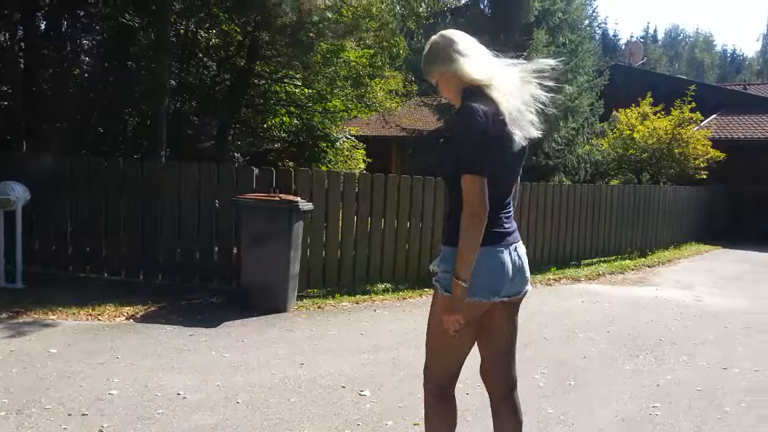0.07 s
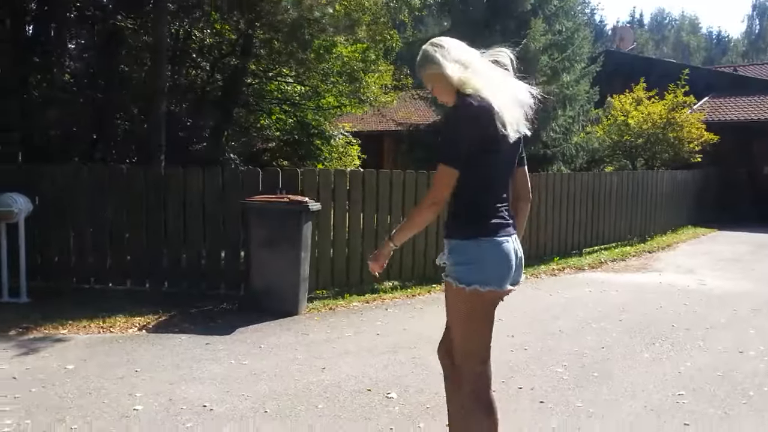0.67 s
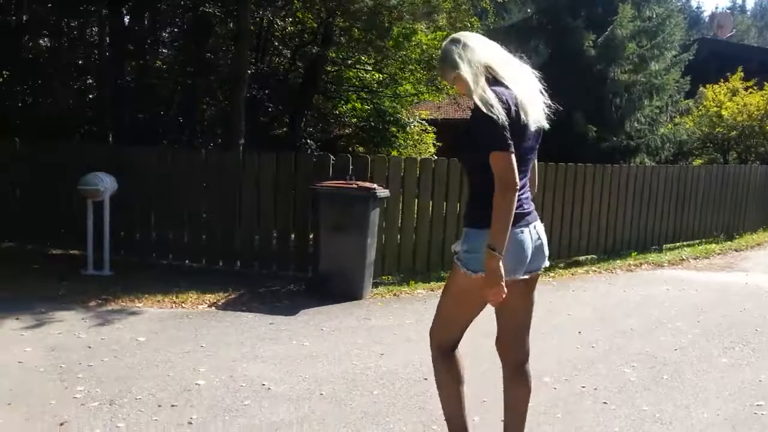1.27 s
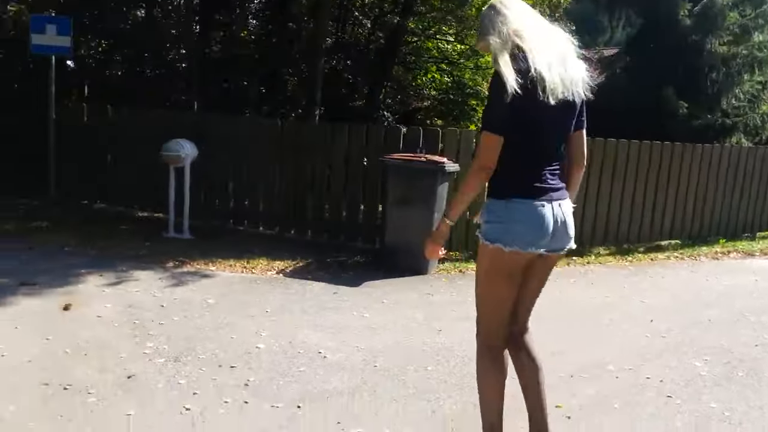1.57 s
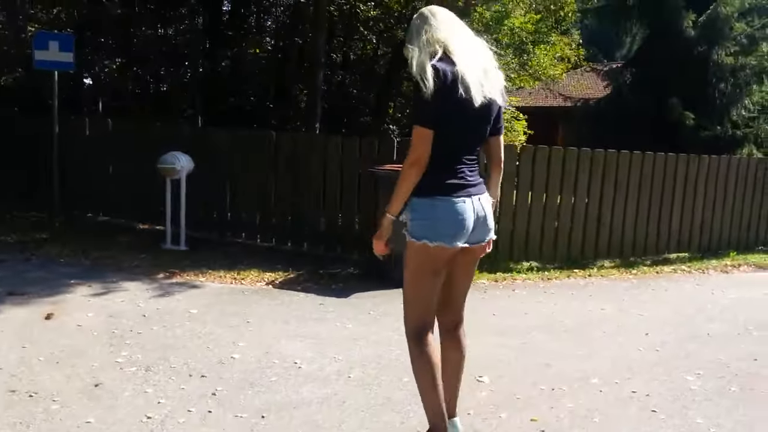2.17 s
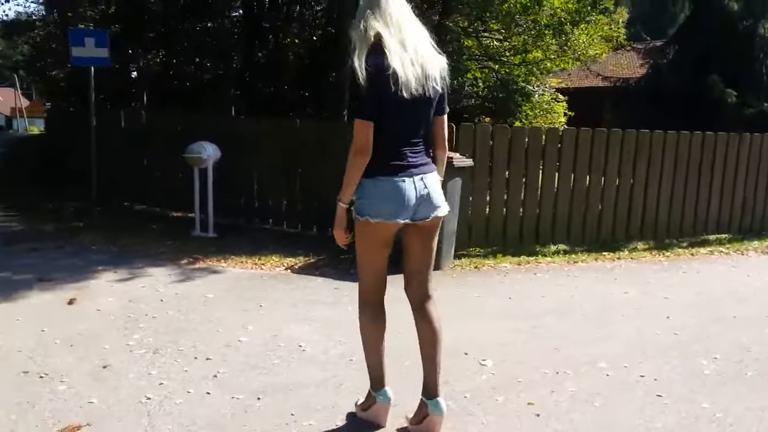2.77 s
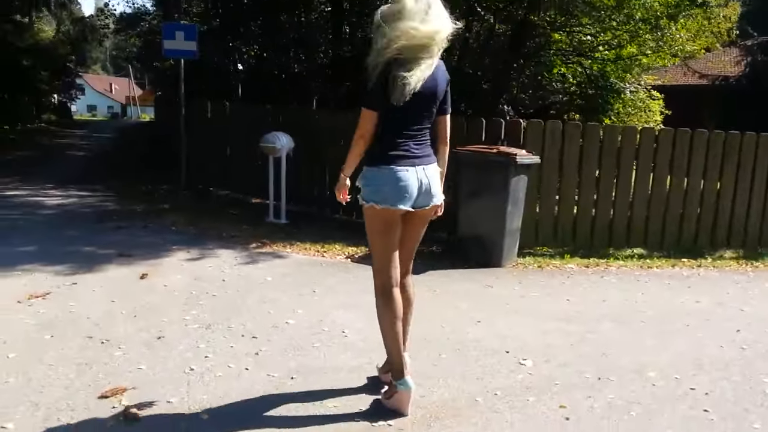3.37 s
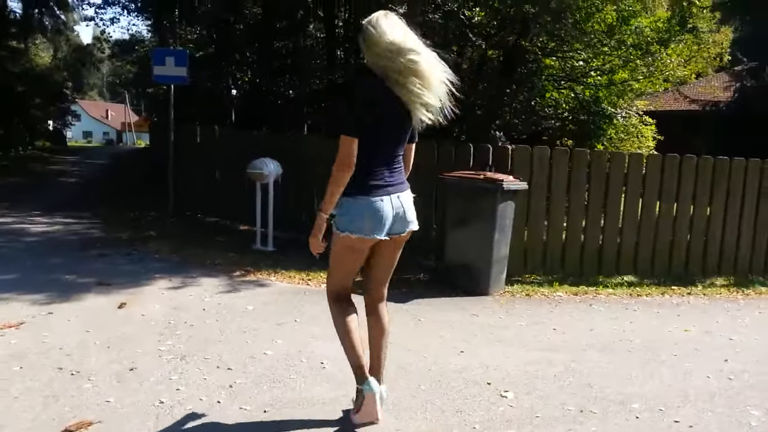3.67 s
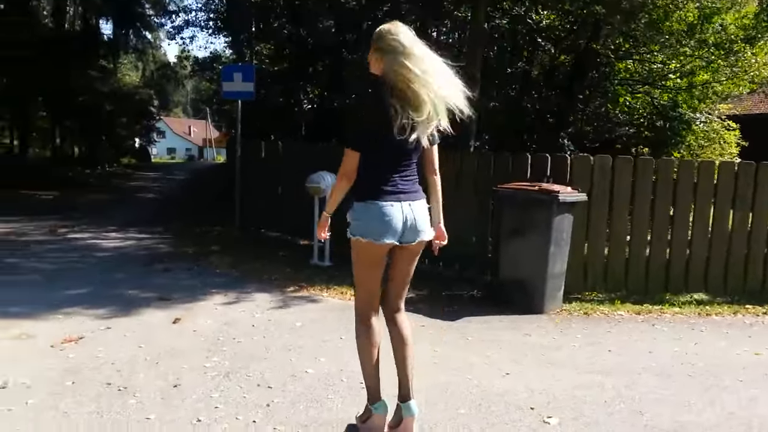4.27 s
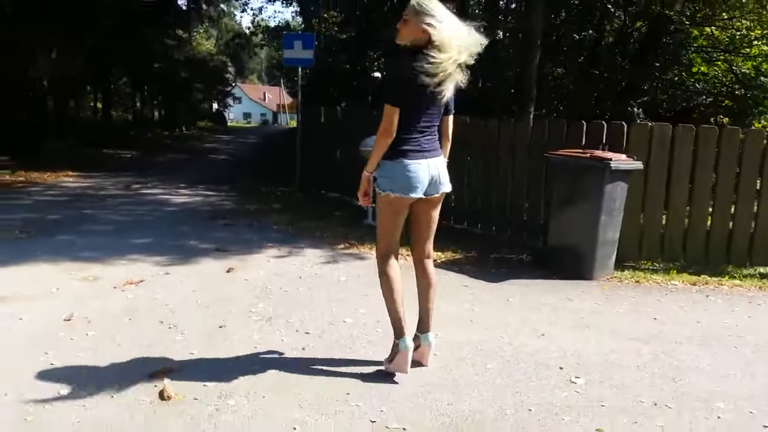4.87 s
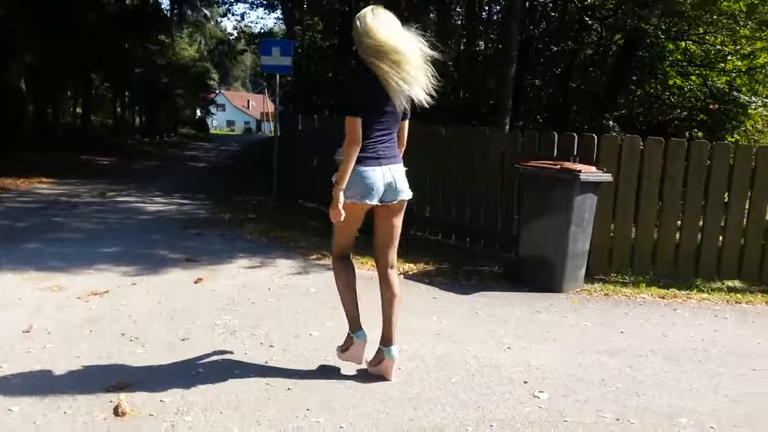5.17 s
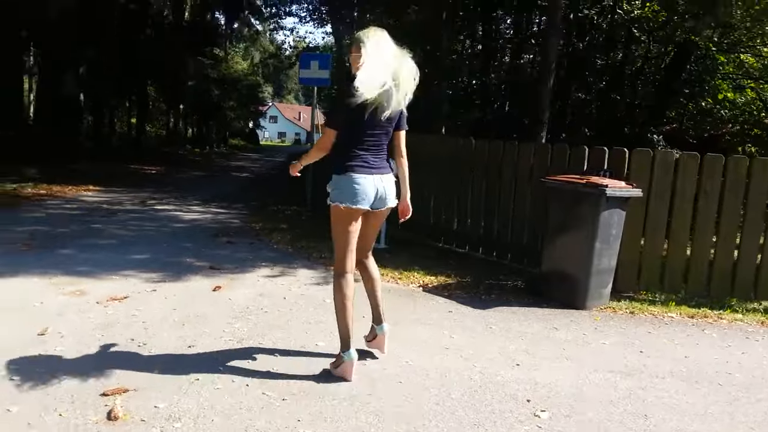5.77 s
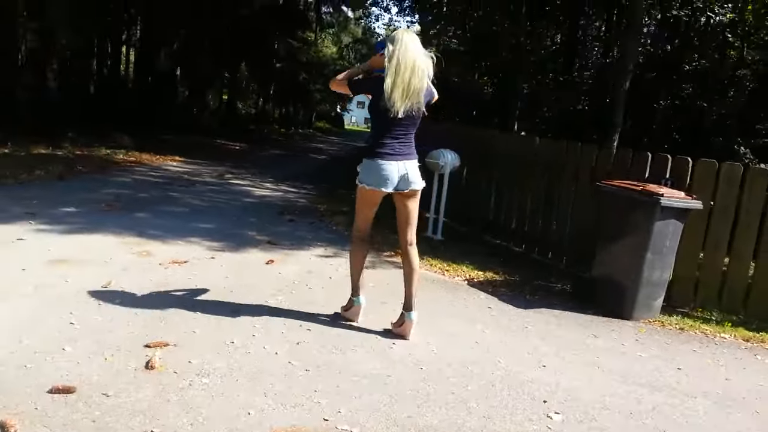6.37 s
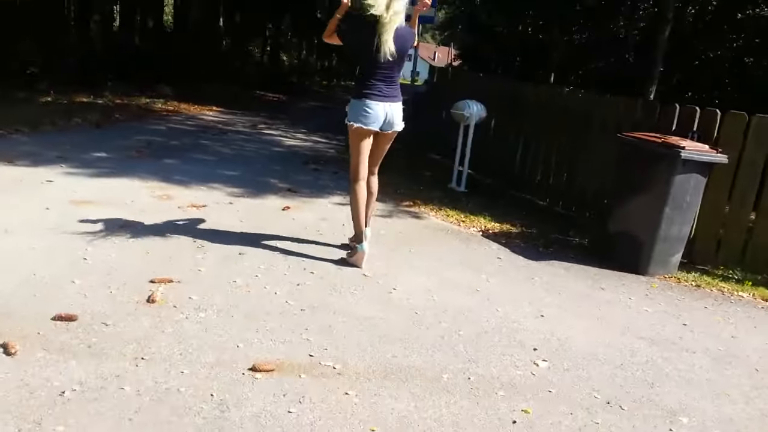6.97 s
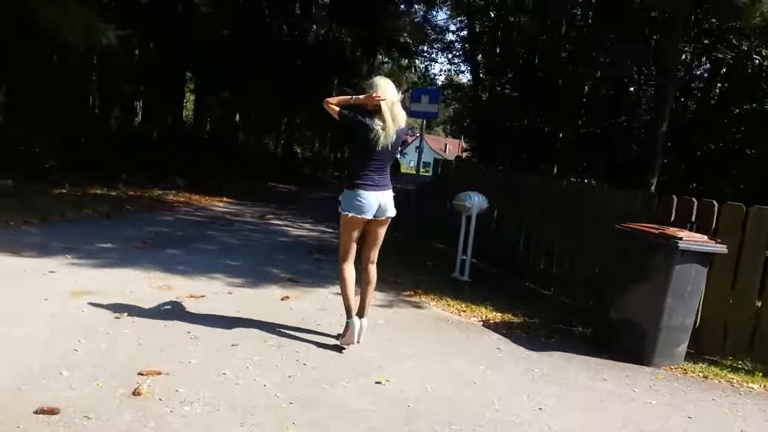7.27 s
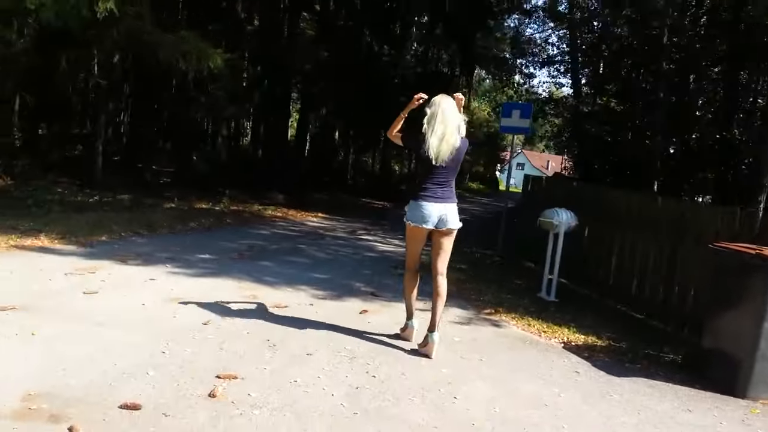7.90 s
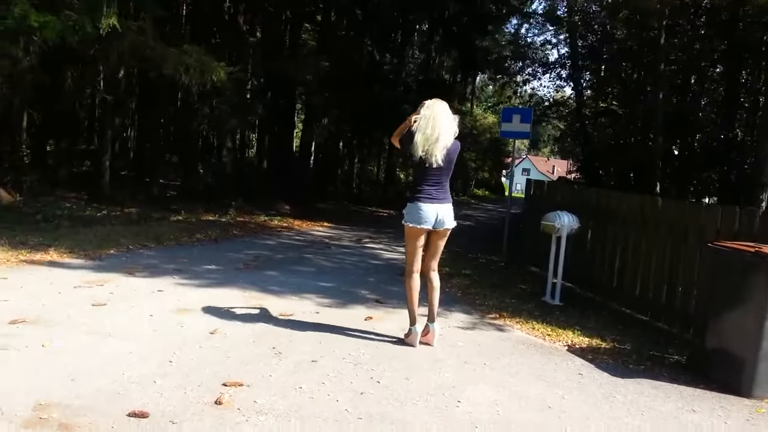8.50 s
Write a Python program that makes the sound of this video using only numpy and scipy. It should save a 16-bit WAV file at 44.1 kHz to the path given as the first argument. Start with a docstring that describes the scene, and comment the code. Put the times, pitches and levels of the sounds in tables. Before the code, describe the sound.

Wind rumbles unevenly on a hand-held microphone, building to strong sputtering gusts midway and then easing. Quieter heeled footsteps knock and crunch irregularly on an asphalt road beneath it, along with close cloth rustles and small snaps. A few very faint, high bird calls come through a soft wash of trees. Later the footsteps end, leaving wind, brief finger rubs and light handling clicks.

```python
"""Gusts buffet the two microphone ports of a hand-held camera: eddies swept past a port are heard as
a rumble, hardest on the left, where puffs break away and single eddies pop. Under the wind, someone
in wedge heels takes short, uneven steps on gritty asphalt, each impact exciting the shoe's resonances.
Sleeve and fingers rustle and tick on the camera by friction and small knocks.
A small bird gives thin, high calls over a soft wash of air in the trees."""
import sys
import numpy as np
from scipy import signal
from scipy.fft import rfft, irfft, next_fast_len
from scipy.io import wavfile
from scipy.ndimage import uniform_filter1d, map_coordinates

SR = 44100
rng = np.random.default_rng(int(sys.argv[2]) if len(sys.argv) > 2 else 0)


def pcm_store(signal):
    """Save signal as 16-bit PCM."""
    levels = np.round(np.clip(np.atleast_2d(signal), -1, 1) * 32767)
    wavfile.write(sys.argv[1], SR, levels.astype(np.int16).T)


N = 385434
T = np.arange(N) / SR
REFERENCE_DB = -35  # wind level at which the eddies have their nominal corner frequency

# steady friction of holding the camera: t/s, sleeve level/dB, grip level/dB
HOLD_FRICTION = [(.44, -71.5, -69.5), (.8, -61, -60.5), (2.05, -66, -68.5), (2.55, -61, -59.5),
                 (3.1, -53.5, -61), (3.75, -54, -57), (3.93, -62.5, -67), (4.15, -54, -60), (4.6, -62, -67),
                 (5.35, -55.5, -55.5), (6.06, -55, -64), (6.16, -65, -71), (6.45, -66.5, -68),
                 (6.76, -58.5, -64), (6.92, -54.5, -51.5), (7.3, -59, -57), (8.73, -61.5, -62)]
# response of the left port's cavity: f/Hz, gain/dB
PORT_CAVITY = [(300, -21), (1500, -26), (3200, -26.5), (4100, -8), (5150, -4), (6000, -8), (7000, -16.5),
               (10000, -21.5), (15000, -40)]
# resonances of a shoe on asphalt: f/Hz, bandwidth/Hz, gain/dB
SHOE_MODES = [(520, 160, 5.5), (850, 285, 3.5), (1370, 186, 3.5), (1780, 280, 1), (2615, 280, 1),
              (4500, 1400, -9), (6200, 3700, -17)]
# spectrum of cracking grit: f/Hz, gain/dB
GRIT_SPECTRUM = [(200, -19), (1000, -12), (2500, 7), (6000, 11), (10000, 8), (15000, -11)]


def amp(db):
    """Amplitude ratio of a level in decibels."""
    return 10 ** (np.asarray(db) / 20)


def unit(x):
    """Normalisation to rms 1."""
    return x / np.sqrt(np.mean(x ** 2) + 1e-20)


def decay(t, t60):
    """Exponential damping: 60 dB down after t60 seconds."""
    return amp(-60 * t / t60)


def curves(rows):
    """Linear interpolation in time: one value per sample for each column after the first."""
    times, *columns = np.transpose(rows)
    return [np.interp(T, times, column) for column in columns]


def wobble(rate):
    """Smooth random modulation: a spline through rate Gaussian knots a second."""
    return map_coordinates(rng.standard_normal(int(N * rate / SR) + 4), [T * rate])


def swell(s, sigma):
    """Gaussian envelope centred on time s."""
    return np.exp(-np.minimum(((T - s) / sigma) ** 2, 100) / 2)


def filtered(x, response):
    """Linear filtering: the spectrum of x times a complex frequency response."""
    size = x.shape[-1]
    padded = next_fast_len(size + 8192)
    return irfft(rfft(x, padded) * response(np.fft.rfftfreq(padded, 1 / SR)), padded)[..., :size]


def coloured(x, points):
    """Spectral shaping by (f/Hz, gain/dB) points joined on a logarithmic frequency axis."""
    f, db = np.transpose(points)
    return filtered(x, lambda hz: amp(np.interp(np.log(hz + 1), np.log(f), db)))


def resonate(x, modes):
    """Modal superposition: x drives second-order resonators of alternating sign."""
    return filtered(x, lambda f: sum(
        (-1) ** k * amp(db) * 1j * f * width / (hz * hz - f * f + 1j * f * width)
        for k, (hz, width, db) in enumerate(modes)))


def bass_cut(x, hz):
    """The microphone's third-order high-pass."""
    return signal.sosfilt(signal.butter(3, hz, "high", fs=SR, output="sos"), x)


def add(track, s, sound):
    """Superposition of a sound on a track from time s."""
    span = track[..., max(round(s * SR), 0):][..., :sound.shape[-1]]
    span += sound[..., :span.shape[-1]]


def grains(rate, spread_db):
    """Log-normal modulation breaks noise into short, uneven grains; rms 1."""
    return unit(rng.standard_normal(N) * amp(spread_db * wobble(rate)))


def outdoors(x, wet_db, t60):
    """Scattering: a diffuse tail from fence and trees follows the direct sound to both ports."""
    t = np.arange(SR // 3) / SR
    tail = rng.standard_normal((2, len(t))) * decay(t, t60) * (1 - np.exp(-t / .0055))
    tail /= np.linalg.norm(tail, axis=1, keepdims=True)
    return x * amp([[.5], [-.5]]) + amp(wet_db) * signal.fftconvolve(x[None], tail, axes=1)[:, :N]


def air_in_trees():
    """Diffuse flow noise: a soft wash, wide because it is uncorrelated between the ports."""
    # spectrum of distant trees: f/Hz, gain/dB
    spectrum = [(30, -4), (150, 10.5), (400, 10), (1000, 4.5), (2500, 2), (6000, -6), (10500, -73.5),
                (15000, -66)]
    return amp(-63.5) * unit(coloured(rng.standard_normal((2, N)), spectrum))


def bird():
    """Frequency modulation: thin whistles waver, rise and level off, smeared by scattering."""
    # calls: t/s, length/s, start f/Hz, end f/Hz, level before the path to the ports/dB
    calls = [(1.59, .15, 7500, 8250, -68), (1.8, .09, 8400, 8500, -70), (4.13, .18, 7500, 8150, -57),
             (6.51, .16, 7650, 8150, -56), (6.68, .14, 7900, 8100, -59)]
    out = np.zeros(N)
    for s, length, start_hz, end_hz, db in calls:
        progress = np.clip((T - s) / length, 0, 1)
        hz = start_hz + (end_hz - start_hz) * np.sin(np.pi / 2 * progress) + 110 * wobble(500)
        out += amp(db) * np.sin(np.pi * progress) * np.sin(2 * np.pi * np.cumsum(hz) / SR)
    return outdoors(out, wet_db=-2, t60=.12) * amp([[-7], [-2]])


def sleeve(unsteady_db=1.5, brush_sigma_s=.022):
    """Friction: fibres slip in fine grains near the right port, swelling with each brush; folds snap."""
    # brushes of the sleeve: middle t/s, level/dB
    brushes = [(.81, -53.5), (1.02, -52), (2.455, -51), (3.53, -42.5), (4.33, -48), (4.929, -58.5),
               (6.53, -52.5), (6.94, -55.5), (7.49, -48.5), (8.15, -59.5)]
    # snaps of a fold: t/s, peak level/dB
    snaps = [(1.006, -34), (1.014, -32), (1.154, -30), (2.164, -27), (2.3369, -21), (2.421, -32),
             (2.536, -23), (2.6377, -32.5), (2.8217, -31), (2.8815, -26.5), (3.076, -23), (3.1053, -21),
             (3.2657, -16.5), (4.0351, -22.5), (4.331, -19), (4.3665, -25.5), (4.3785, -27), (4.4691, -34),
             (5.4762, -36), (7.5638, -25), (8.1248, -33)]
    # spectra of rubbing and of snapping cloth: f/Hz, gain/dB
    cloth_spectrum = [(200, -18), (1000, 3), (3000, 7), (6500, 2.5), (9500, 5.5), (12000, 4.5),
                      (15000, -1.5)]
    snap_spectrum = [(1000, -54), (5000, -2), (7500, 10), (9600, 15.5), (12000, 5.5), (15000, -6)]
    level = amp(curves(HOLD_FRICTION)[0] + unsteady_db * wobble(14))
    level += sum(amp(db) * swell(s, brush_sigma_s) for s, db in brushes)
    slips = np.array([grains(1200, spread_db=3.5) for _ in range(2)])
    rustle = level * amp([[-5], [0]]) * unit(coloured(slips, cloth_spectrum))
    t = np.arange(SR // 10) / SR
    envelope = decay(t, .0035) + .1 * decay(t, .11)
    for s, db in snaps:
        snap = coloured(rng.standard_normal((2, len(t))) * envelope, snap_spectrum)
        add(rustle, s - .0005, amp(db) * amp([[-11], [0]]) * snap / np.abs(snap).max())
    return rustle


def grip():
    """Resonance: rubbing and ticking ring the left port's cavity; the case's modes add a small knock."""
    # ticks of the case under the grip: t/s, level of the cavity pulse/dB
    ticks = [(3.992, -24), (5.595, -24), (7.651, -18.5), (7.7437, -16), (7.789, -27), (7.8704, -16.5),
             (7.9429, -25.5), (8.0472, -24), (8.2357, -27.5), (8.301, -27.5), (8.3945, -25.5),
             (8.4718, -23.5), (8.676, -23)]
    rub = amp(curves(HOLD_FRICTION)[1]) * unit(coloured(grains(2500, spread_db=3.5), PORT_CAVITY))
    out = np.array([rub, amp(-49) * rub])
    t = np.arange(SR // 20) / SR
    pulse = np.exp(-((t - .0004) / .00025) ** 2)
    case_modes = [(850, 1), (1450, .36), (2600, .36)]  # f/Hz, relative amplitude
    case = decay(t, .0062) * sum(gain * np.sin(2 * np.pi * hz * t) for hz, gain in case_modes)
    for s, db in ticks:
        cavity = pulse * np.sin(2 * np.pi * 5000 * t * (1 + rng.normal(0, .013)))
        chatter = .16 * unit(coloured(rng.standard_normal(len(t)), PORT_CAVITY)) * decay(t, .033)
        left = cavity + chatter + .14 * case
        right = .014 * cavity + .18 * case
        add(out, s, amp(db) * np.array([left, right]))
    return out


def finger_strokes(fade_s=.024):
    """Cavity resonance: a finger slides past the left port, makes it hiss and lifts off."""
    # strokes: t/s, length/s, level in the middle/dB, rise from start to end/dB
    strokes = [(5.623, 0.09, -37.5, 12.5), (5.837, 0.13, -39.5, 4.5), (5.986, .05, -38, 9.5),
               (6.039, 0.057, -43.5, -4), (6.608, 0.026, -42.5, -7), (6.918, 0.037, -38, 13),
               (6.957, 0.042, -52.5, 4)]
    level = np.zeros(N)
    for s, length, db, rise_db in strokes:
        contact = np.clip(np.minimum(T - s, s + length - T) / fade_s + .5, 0, 1)
        progress = np.clip((T - s) / length, 0, 1)
        level += contact * amp(db + rise_db * (progress - .5))
    hiss = level * unit(coloured(rng.standard_normal(N), PORT_CAVITY))
    return np.array([hiss, amp(-26) * hiss])


def scuffs():
    """Forced vibration: a sliding sole rolls grit, which hisses and shakes the shoe."""
    # drags of a sole: middle t/s, sigma/s, level/dB, shoe's share of the power (0-1)
    drags = [(0.799, 0.00089, -32.5, 0.65), (3.511, 0.011, -41, 0.6), (3.552, 0.00077, -29.5, 0.99),
             (3.56, 0.014, -33, 0.93), (4.334, 0.011, -42.5, 0.2), (4.78, 0.011, -56, 0.85),
             (5.157, 0.0022, -31.5, 0.37)]
    shoe = unit(resonate(grains(1500, spread_db=2.5), SHOE_MODES))
    grit = unit(coloured(grains(900, spread_db=9.5), GRIT_SPECTRUM))
    out = np.zeros(N)
    for s, sigma, db, share in drags:
        out += amp(db) * swell(s, sigma) * (share ** .5 * shoe + (1 - share) ** .5 * grit)
    return out


def steps(sole_delay_s=.0105, sole_db=-12.5, contact_t60=.012):
    """Impact excitation: the heel knocks, the sole follows weaker, and grit cracks a moment longer."""
    # footfalls: t/s, peak level of the knock/dB, grit relative to the knock/dB
    footfalls = [(0.7884, -30, -16), (1.444, -35.5, -6), (2.126, -31, -13), (2.78, -33, -3.5),
                 (3.181, -28.5, -5), (3.431, -39.5, -2), (3.679, -30, -16), (4.121, -38, -20),
                 (4.788, -38.5, -12.5), (5.142, -30, -4.5), (5.386, -40.5, 13), (5.953, -41, 3),
                 (6.087, -45, 3), (6.495, -30, -1.5), (6.537, -35.5, -1)]
    out, t = np.zeros(N), np.arange(SR // 5) / SR
    sole = (t > sole_delay_s) * amp(sole_db) * decay(np.abs(t - sole_delay_s), contact_t60)
    contacts = decay(t, contact_t60) + sole
    for s, db, grit_db in footfalls:
        blow, crunch, sizes = rng.standard_normal((3, len(t)))
        knock = resonate(blow * (contacts + .12 * decay(t, .054)), SHOE_MODES)
        grit = coloured(crunch * amp(15.6 * sizes) * (contacts + .87 * decay(t, .07)), GRIT_SPECTRUM)
        add(out, s, amp(db) * (knock / np.abs(knock).max() + amp(grit_db) * grit / np.abs(grit).max()))
    return out


def eddy(s, db, hz):
    """Start time and pressure pulse of a bursting eddy: a push, then a slower rebound of equal area."""
    t = np.arange(-128, 512) / SR
    phase = 2 * np.pi * hz * t
    push = np.exp(-(phase / .8) ** 2 / 2)
    rebound = .5 * np.exp(-((phase - 2) / 1.6) ** 2 / 2)
    return s + t[0], amp(db) * (push - rebound)


def buffet(corner_hz, lump_db, sharpen, cut_hz):
    """Frozen turbulence swept past a port, faster lumps louder and brighter; local rms 1."""
    lumps_db = lump_db * (.8 * wobble(150) + .6 * wobble(45))
    pattern_hz = 800
    pattern = filtered(rng.standard_normal(N),
                       lambda f: (np.hypot(1, f / pattern_hz) * (1 + (f / pattern_hz) ** 6)) ** -.5)
    place = np.cumsum(corner_hz * amp(sharpen * lumps_db)) / pattern_hz
    pressure = bass_cut(map_coordinates(pattern, [place], mode="wrap") * amp(lumps_db), cut_hz)
    power = uniform_filter1d(uniform_filter1d(pressure ** 2, size=1100), size=700)
    return pressure / np.sqrt(np.abs(power) + 1e-12)


def pops():
    """Pressure transients: the biggest eddies burst on the left port as single pops."""
    # bursting eddies: t/s, level of the push/dB, centre f/Hz
    bursts = [(0.46, -10, 815), (0.519, -11, 1100), (1.1414, -4, 815), (1.5033, -18, 370),
              (2.471, -10, 755), (2.4745, -1.5, 625), (2.4803, -4, 610), (2.9336, -10, 584),
              (2.9732, -10.5, 860.2), (3.143, -8, 754), (3.1263, 6, 529.1), (3.1746, 2.5, 1110),
              (3.279, -2, 1040), (3.3057, 2.5, 640.3), (3.337, -5, 971), (3.3623, -1.5, 716),
              (3.4134, -9, 982), (3.4435, 1, 620), (3.4469, 1, 860), (3.468, 1.5, 540), (3.6447, -2, 666),
              (3.8229, -8, 646), (4.0728, -3, 768.5), (4.2407, -9, 652), (4.259, 3, 895.5),
              (5.1839, -7.5, 731), (5.218, -7, 876.5), (5.3465, -20, 520.3), (5.388, -11.5, 505),
              (5.403, -6, 520), (5.8035, -11.5, 448.5)]
    out = np.zeros(N)
    for s, db, hz in bursts:
        add(out, *eddy(s, db, hz))
    return np.array([out, amp(-64) * out])


def puffs(attack_s=.003007, release_s=.0053, sputter_gap_s=.0045, strong_db=-17, top_eddy_hz=1160):
    """Flow separation: air breaks away at the left port, sputters with small eddies and dies quickly."""
    # puffs: t/s, length/s, level/dB
    separations = [(0.966, .012, -23), (1.036, .01, -24), (1.848, 0.0092, -28), (2.44, 0.025, -18.5),
                   (2.47, 0.029, -20.5), (2.899, .04, -22), (2.989, 0.059, -25), (3.056, 0.15, -16),
                   (3.247, .1, -17.5), (3.403, 0.071, -14.5), (3.616, 0.044, -18), (3.733, 0.029, -25),
                   (4.063, 0.031, -16), (4.16, .03, -20), (4.238, 0.043, -13.5), (4.312, 0.051, -19),
                   (4.53, .025, -24.5), (4.674, 0.026, -26), (4.722, .026, -18.5), (4.791, .012, -20.5),
                   (4.887, .012, -22), (4.912, 0.01608, -21), (4.976, .037, -22.5), (5.055, .023, -29),
                   (5.144, .033, -19), (5.178, .117, -18.5), (5.343, 0.029, -19.5), (5.384, 0.048, -21.5),
                   (5.471, 0.032, -23.5), (5.56, .11, -23), (5.803, 0.046, -27), (5.909, 0.058, -30),
                   (6.078, .012, -31), (6.379, 0.019, -34), (6.803, .012, -24.5), (6.847, 0.013, -24.5),
                   (7.158, 0.0096, -25), (7.956, 0.016, -27), (7.978, .02, -28), (8.289, .02, -29.5),
                   (8.469, 0.013, -27.5)]
    level, sputter, t = np.zeros(N), np.zeros(N), np.arange(SR // 4) / SR
    nominal_hz = 238.7
    corner_hz = np.full(N, nominal_hz)
    for s, length, db in separations:
        # long, strong puffs are faster and so brighter
        hz = (nominal_hz + 1300 * length) * amp(.13 * (db - REFERENCE_DB))
        corner_hz[round(s * SR):] = hz
        envelope = np.clip(t / attack_s, 0, 1) * np.exp(-np.maximum(t - length, 0) / release_s)
        add(level, s - attack_s / 2, amp(db) * envelope)
        gaps, sizes, pitches = rng.standard_normal((3, 48))
        delays = np.cumsum(sputter_gap_s * amp(4 * gaps))
        for delay, size, pitch in zip(delays[delays < length], sizes, pitches):
            eddy_hz = min(hz * amp(3.2 * pitch + size + .83 * (db - strong_db)), top_eddy_hz)
            add(sputter, *eddy(s + delay - attack_s, db + 2.5 + 3 * size, eddy_hz))
    turbulence = level * buffet(corner_hz, lump_db=3, sharpen=.4, cut_hz=108)
    out = bass_cut(turbulence + sputter, hz=56.6)
    return np.array([out, amp(-42.5) * out])


def wind(flutter_db=3, flutter_per_s=30):
    """Turbulent pressure: each port meets its own fluttering eddies, brighter as the wind grows."""
    # gusts on the exposed left and the sheltered right port: t/s, level/dB
    left_gusts = [(.44, -43), (.86, -29), (.99, -25), (1.12, -33), (1.36, -31), (1.5, -40), (2.13, -41),
                  (2.25, -51), (2.48, -29), (2.72, -38), (2.88, -35), (3.06, -24), (3.5, -19), (3.62, -28),
                  (4.3, -27), (4.6, -38), (4.76, -33), (4.92, -42), (5.12, -29), (5.76, -27), (6.02, -51),
                  (6.14, -37), (6.33, -44.5), (6.84, -29.5), (7.4, -30.5), (7.58, -39), (8.14, -37),
                  (8.56, -29), (8.73, -39)]
    right_gusts = [(.46, -50), (.64, -26.5), (1.38, -29), (2.21, -43), (2.549, -35), (3.349, -46),
                   (3.651, -44), (3.88, -33), (4.28, -37), (4.52, -50), (5.249, -42), (5.7, -44),
                   (6.2, -64), (6.52, -42), (6.78, -43), (6.9, -54), (7.52, -58), (7.78, -37), (7.99, -35),
                   (8.13, -56.5), (8.73, -50)]
    left_db = curves(left_gusts)[0] + flutter_db * wobble(flutter_per_s)
    right_db = curves(right_gusts)[0] + flutter_db * wobble(flutter_per_s)
    windward_db = left_db - right_db  # the left port also brightens as the wind turns on to it
    left_hz = 186.84 * amp(.13 * (left_db - REFERENCE_DB) + .055 * windward_db)
    right_hz = 190.3 * amp(.18 * (right_db - REFERENCE_DB))
    left = amp(left_db) * buffet(left_hz, lump_db=4, sharpen=.27, cut_hz=94)
    right = amp(right_db) * buffet(right_hz, lump_db=2.5, sharpen=.35, cut_hz=61.6)
    return np.array([left, right])


def scene():
    """Superposition of all sources at the two ports."""
    shoes = outdoors(steps() + scuffs(), wet_db=-8, t60=.12)
    airflow = wind() + puffs() + pops()
    handling = sleeve() + grip() + finger_strokes()
    return airflow + shoes + handling + bird() + air_in_trees()


def record(dry):
    """Soft saturation and band limiting: the camera fades in, rounds the peaks and cuts the top treble."""
    open_s, fade_s, ceiling, top_hz = .4195, .028, .98, 14650
    opened = dry * np.clip((T - open_s) / fade_s, 0, 1)
    rounded = opened / (1 + (opened / ceiling) ** 6) ** (1 / 6)
    return filtered(rounded, lambda hz: hz < top_hz)


dry = scene()
out = record(dry)
pcm_store(out)
```